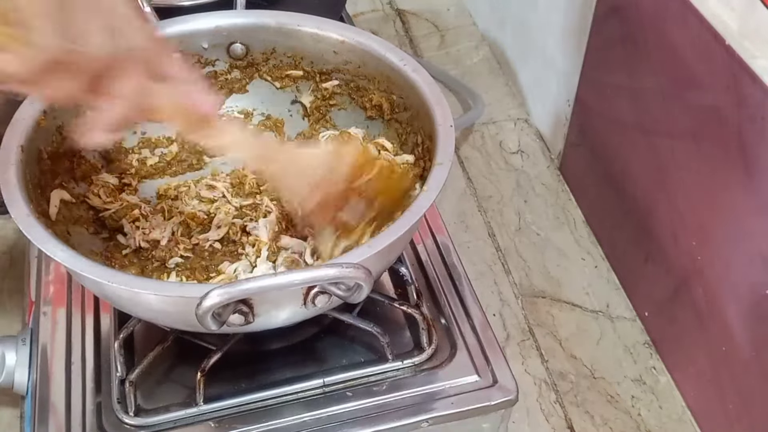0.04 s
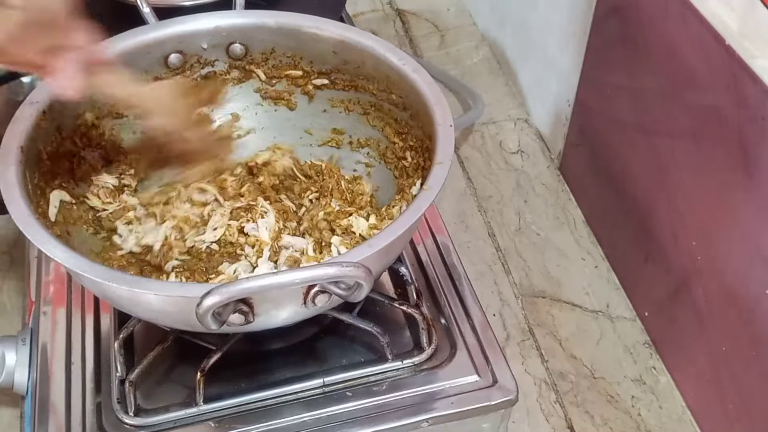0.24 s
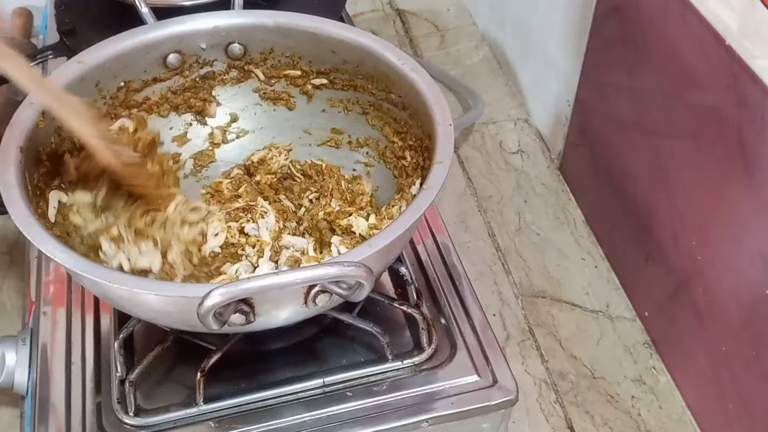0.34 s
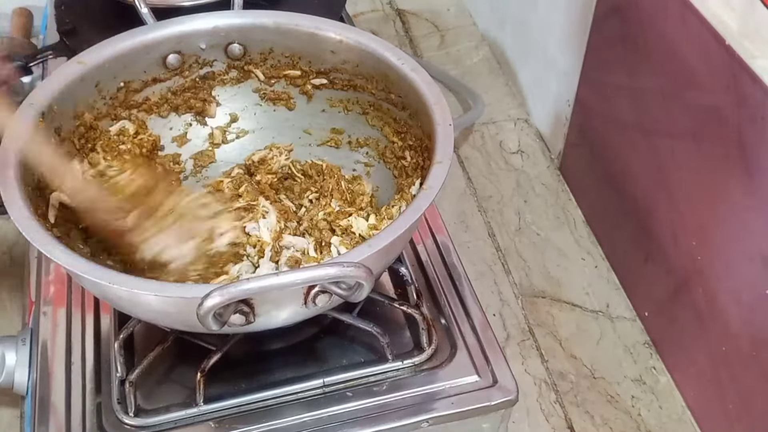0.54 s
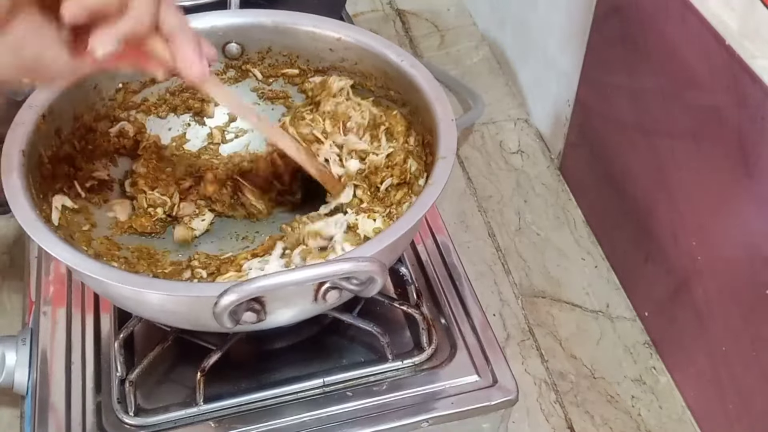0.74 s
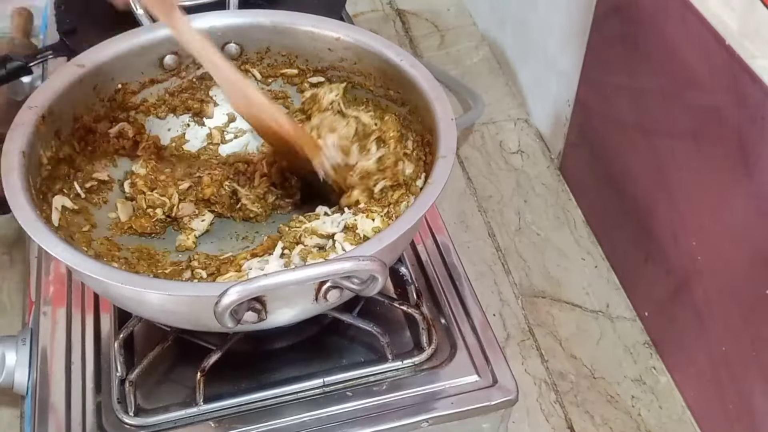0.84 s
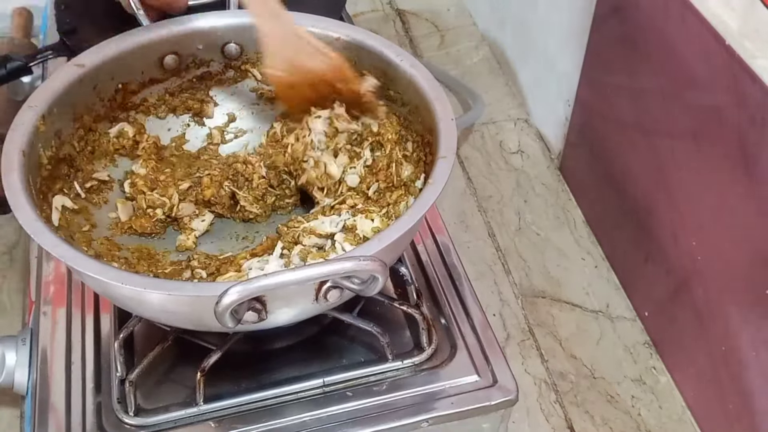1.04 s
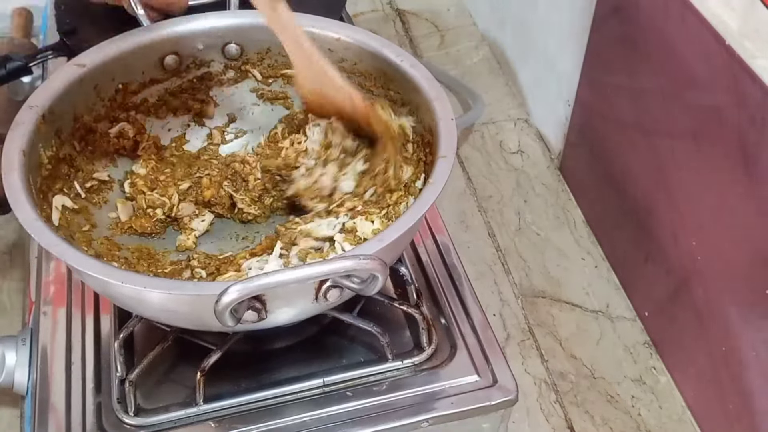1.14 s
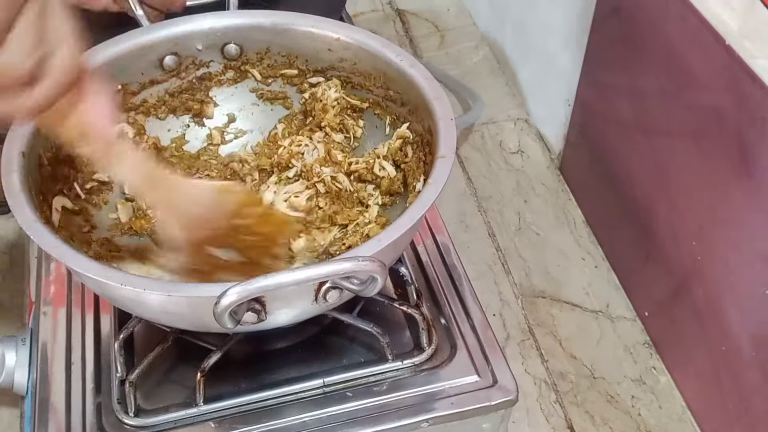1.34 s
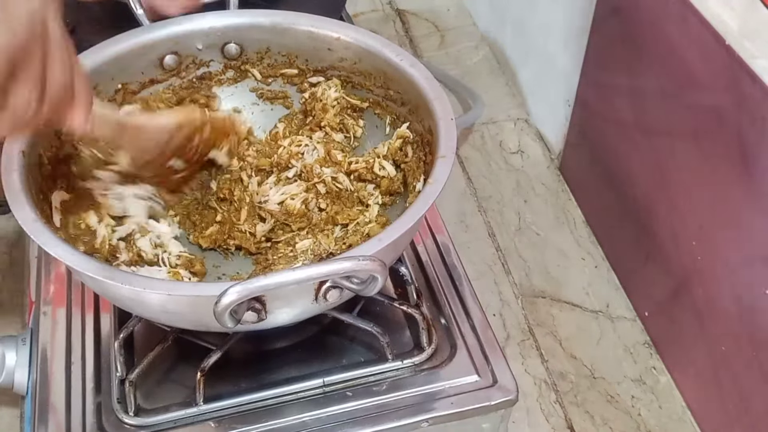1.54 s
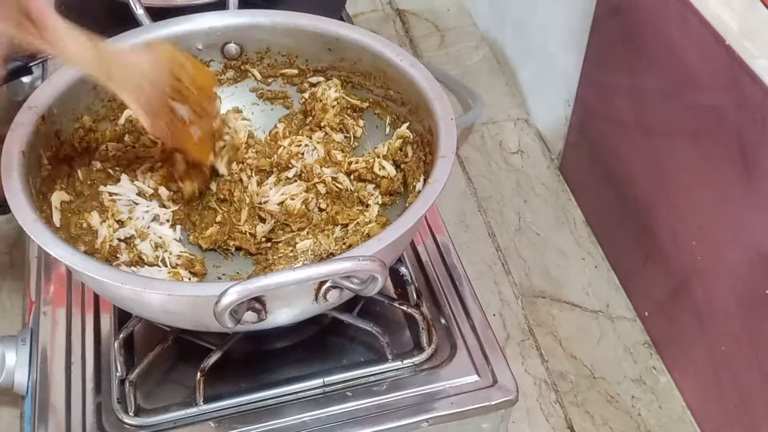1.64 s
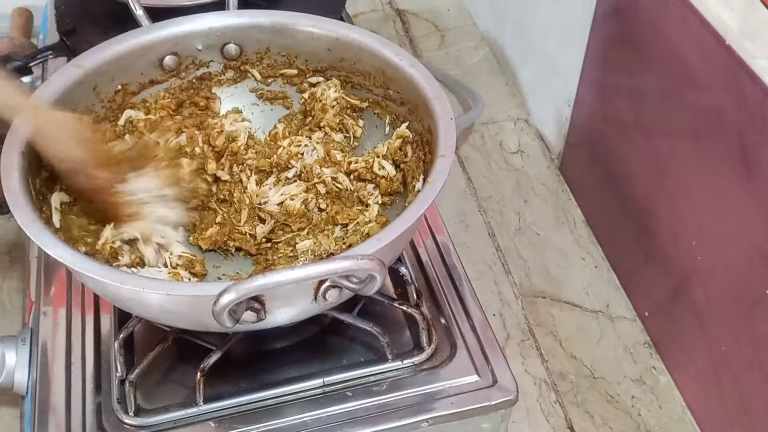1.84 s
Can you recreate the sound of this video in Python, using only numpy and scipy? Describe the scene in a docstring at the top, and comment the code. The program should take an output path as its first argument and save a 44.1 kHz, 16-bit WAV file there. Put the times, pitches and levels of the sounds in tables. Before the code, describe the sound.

A wooden spatula stirs moist filling in a metal pan, first juddering and clacking against the wall, then pushing through more softly. The food squelches and sizzles over a faint gas hiss, heard close up in a small kitchen.

```python
"""In a small kitchen, a wooden spatula stirs a moist chicken filling in a metal pan on a gas ring.
In the first stroke the blade judders over the pan and clacks against its wall, making metal and wood
ring; the second is a softer push through the food. The filling squelches and sizzles as it is turned,
a crowd of tiny clicks, and the burner hisses faintly throughout."""
import sys
import numpy as np
from scipy import signal
from scipy.fft import rfft, irfft
from scipy.io import wavfile
from scipy.ndimage import map_coordinates

SR = 44100
rng = np.random.default_rng(int(sys.argv[2]) if len(sys.argv) > 2 else 0)


def inscribe(sig):
    """Save sig as 16-bit PCM at rate SR to the path in sys.argv[1].

    A 1-D sig is mono; a 2-D sig holds one channel per row.
    Samples are clipped to [-1, 1] before scaling.
    """
    pcm = np.round(np.clip(np.atleast_2d(sig).T, -1, 1) * 32767)
    wavfile.write(sys.argv[1], SR, pcm.astype(np.int16))


N = 83790
TIME = np.arange(N) / SR
CLACK_ROOM_DB, KNOCK_ROOM_DB, BOOM_ROOM_DB, SQUELCH_ROOM_DB = -6, -1, -18.5, -14.5   # echo levels
GRAINS_PER_S, GRAIN_SPREAD_DB = 14000, 3   # the tiny clicks of rubbing and squelching
BOOM_LAG_S = 0.00097   # the deep sound starts just after the hit

# bright ringing tones of the pan wall and blade: (pitch [Hz], width [Hz], level [dB])
PAN_HIGH_TONES = [(1126, 31, -1), (1426, 29, 0.5), (1817, 116, -0.5), (2043, 99, 5), (2562, 76, 4.5),
                  (2847, 150, 3), (3587, 160, 0), (3963, 230, -1.5), (4270, 225, 5), (4686, 180, -1.5),
                  (4954, 110, 2.5), (5180, 56, -1), (5325, 150, 2.5), (5786, 204, 2), (6330, 227, 2.5),
                  (7160, 630, -5), (9260, 960, -15)]
# deep tones of the full pan on its stand: (pitch [Hz], width [Hz], level [dB])
PAN_LOW_TONES = [(50.5, 25, -37), (100.2, 16.4, -13.5), (175.3, 35.4, -11.5), (195, 11.7, -11.5),
                 (244.9, 22.4, -1), (269.9, 14, -1), (324.4, 18.2, 3.5), (366.3, 21, 1.5),
                 (405.4, 25.4, -4.5), (459, 41, -14), (558.5, 62, -10), (641, 91, -15.5),
                 (770.6, 31.3, -6.5), (774, 76, -11), (1001, 44, -21.5)]
# short-lived tones of the wooden spatula: (pitch [Hz], width [Hz], level [dB])
WOOD_TONES = [(433.8, 25, 11.5), (687, 149, 1.5), (789, 76, 4.5), (1000, 138, 3), (1174, 101, -4.5),
              (1427, 244, -4), (2175, 670, -6), (3300, 136, -3.5), (3760, 320, -9)]
# the spatula hits the pan:
# (time [s], bright clack [dB], wooden knock [dB], pan boom [dB], contact length [s], treble limit [Hz])
HITS = [(.197, -49, -60, -41.5, 0.0055, 3000), (.204, -47, -49, -40, 0.0087, 10000),
        (0.3286, -39, -46.5, -43, 0.0092, 6900), (0.3433, -42.5, -41, -33, 0.0087, 6050),
        (0.3959, -31, -41.5, -30.5, .007, 11800), (.437, -54, -55, -36.5, 0.013, 4000),
        (0.5106, -37, -46.5, -33, 0.0059, 6540), (0.5947, -41.5, -31, -33, 0.0038, 6060),
        (0.7539, -31.5, -37.5, -31, 0.0075, 11800), (0.808, -51, -56, -48, .008, 4500),
        (0.8538, -35.5, -43.5, -36, 0.0084, 8000), (0.8822, -39.5, -42.5, -37.5, 0.01, 5470),
        (0.904, -50, -55, -45, .0038, 3500), (.994, -49, -54.5, -37.5, 0.0128, 3940)]


def spatula_hits():
    """Each hit rings the pan wall, the wood and the whole pan; food under the blade dulls the clack."""
    force = 0
    for time, db, _, _, length_s, top_hz in HITS:
        push = contacts([time], [db], chatter=2.9, chatter_s=length_s)
        force = force + soften(push + 1e-18, top_hz)
    times, _, knock_db, boom_db, _, _ = np.transpose(HITS)
    clack = ring(force, PAN_HIGH_TONES)
    knock = ring(contacts(times, knock_db), WOOD_TONES)
    boom = ring(contacts(times + BOOM_LAG_S, boom_db), PAN_LOW_TONES)
    return (kitchen(clack, CLACK_ROOM_DB) + kitchen(knock, KNOCK_ROOM_DB, top_hz=2420)
            + kitchen(boom, BOOM_ROOM_DB))


# how hard the blade drags on the pan: (time [s], level [dB])
DRAG_LEVELS = [(0, -65.5), (.14, -110), (.165, -56), (.26, -38), (.31, -49.5), (.44, -44.5), (.58, -44.5),
               (.64, -38), (.715, -51.5), (.79, -45), (.84, -42.5), (1.04, -49.5), (1.11, -77),
               (1.205, -78), (1.23, -45), (1.4, -50), (1.525, -44.5), (1.595, -51.5), (1.645, -49.5),
               (1.69, -62.5), (1.9, -88)]
# the blade rubs through the food along the pan wall: (time [s], level [dB])
RUB_LEVELS = [(.18, -83), (.23, -54.5), (.32, -57), (.36, -58), (.44, -50), (.58, -61.5), (.68, -54.5),
              (.745, -46.5), (.83, -54), (.91, -53), (1, -78), (1.22, -90), (1.35, -64), (1.43, -56),
              (1.54, -51.5), (1.65, -69.5), (1.75, -90)]


def scraping():
    """The blade sticks and slips, shaking the whole pan; finer rubbing rings its wall and the wood."""
    slips = grains(per_s=890, spread_db=-1) * level(DRAG_LEVELS)
    friction = grains(GRAINS_PER_S, GRAIN_SPREAD_DB) * level(RUB_LEVELS) * from_db(drift(rate_hz=59))
    judder = ring(slips, PAN_LOW_TONES)
    rub = ring(friction, PAN_HIGH_TONES) + ring(friction, WOOD_TONES)
    return kitchen(judder, BOOM_ROOM_DB) + kitchen(moving_echoes(rub), SQUELCH_ROOM_DB)


# the filling squelches as it is pushed about: (time [s], level [dB])
SQUELCH_LEVELS = [(0, -62), (.165, -63.5), (.21, -46.5), (.3, -52.5), (.37, -52.5), (.41, -50), (.49, -59),
                  (.58, -60.5), (.66, -56.5), (.755, -45), (.82, -48.5), (.93, -62), (1.08, -61.5),
                  (1.2, -58.5), (1.24, -51.5), (1.35, -49), (1.44, -44.5), (1.525, -44.5), (1.605, -48),
                  (1.655, -58.5), (1.9, -65)]
# how strong the squelch is from low to high: (pitch [Hz], level [dB])
SQUELCH_COLOUR = [(200, 0), (900, -9), (1600, -4.5), (3000, -2.5), (4500, -1.5), (5700, 7.5), (6450, 12),
                  (7200, 3), (8300, 4), (11000, 0.5), (12700, -14), (13800, 0), (15000, 3.5)]
# moist bits of filling pop: (time [s], level [dB])
POPS = [(1.123, -52), (1.141, -54.5), (1.157, -61)]


def filling():
    """Wet crackle follows the stirring; between strokes come a few pops, each lower than the last."""
    stir = level(SQUELCH_LEVELS) * from_db(0.8 * drift(rate_hz=44))
    clicks = moving_echoes(grains(GRAINS_PER_S, GRAIN_SPREAD_DB))
    crackle = stir * coloured(clicks, SQUELCH_COLOUR)
    first_hz, width_hz, fall_octaves_per_s = 5970, 830, 9.1
    for time, db in POPS:
        hz = first_hz * 2 ** (-fall_octaves_per_s * (time - POPS[0][0]))
        pop = contacts([time], [db], chatter=7.1, chatter_s=0.0094)
        crackle = crackle + ring(pop, [(hz, width_hz, 0)])
    return kitchen(crackle, SQUELCH_ROOM_DB)


# the blade shoves a heap of filling: (time [s], wooden thud [dB], stove thump [dB])
SHOVES = [(.237, -38, -49), (0.339, -64, -42), (.46, -62, -49.5), (0.761, -63, -54.5), (1.234, -49.5, -53),
          (1.296, -43.5, -47.5)]
# deep tones of the stove frame: (pitch [Hz], width [Hz], level [dB])
STOVE_TONES = [(95, 30, -3.5), (122.3, 9.7, 4.5)]


def shoves():
    """Pushes cushioned by food: the wood thuds and the stove frame thumps, both muffled."""
    times, thud_db, thump_db = np.transpose(SHOVES)
    thud = ring(contacts(times, thud_db, chatter=1.5, chatter_s=0.0218), WOOD_TONES)
    thump = ring(contacts(times + BOOM_LAG_S, thump_db), STOVE_TONES)
    return soften(kitchen(thud, KNOCK_ROOM_DB) + thump, top_hz=730)


# the blade brushes the metal: (time of peak [s], fade time [s], pitch [Hz], level [dB])
GRAZES = [(.01, 0.032, 1550, -59), (1.095, 0.076, 4980, -66)]


def grazes(width_hz=310):
    """A light rub swells and fades, making one tone of the metal sing faintly."""
    out = 0
    for time, fade_s, hz, db in GRAZES:
        rub = rng.standard_normal(N) * np.exp(-((TIME - time) / fade_s) ** 2)
        out = out + from_db(db) * ring(rub, [(hz, width_hz, 0)])
    return out


# how strong the flame's hiss is from low to high: (pitch [Hz], level [dB])
FLAME_COLOUR = [(25, 2), (60, 11.5), (150, 11), (400, 2.5), (950, -8), (1300, -4.5), (1520, 17),
                (1900, -13), (2300, 15), (2950, -6), (3400, 11), (4200, -14), (6400, -3), (7600, -13),
                (10000, -7), (12300, 16.5), (13800, -6), (15100, 7.5)]
# thin whistles of the gas jet: (pitch [Hz], width [Hz], level [dB])
JET_TONES = [(6490, 300, -3.5), (10550, 240, -9), (11050, 160, 3), (12480, 270, -1), (15400, 250, 0)]


def burner():
    """The flame hisses steadily and the gas jet adds thin whistles."""
    hiss = from_db(-61) * coloured(rng.standard_normal(N), FLAME_COLOUR)
    whistles = from_db(-61.5) * ring(rng.standard_normal(N), JET_TONES)
    return hiss + whistles


def moving_echoes(x, delays_s=(.0013, .0023), swing=0.072, gain=.8):
    """Echoes off the pan wall and stove top shift as the blade moves, so the tone colour glides."""
    out = x
    for delay_s in delays_s:
        lag = delay_s * SR * (1 + swing * drift(rate_hz=2.5))
        out = out + gain * map_coordinates(x, [np.arange(N) - lag], order=3)
    return out / np.sqrt(1 + len(delays_s) * gain ** 2)


def kitchen(x, echo_db, top_hz=None):
    """Add the room's short wash of echoes, whose treble dies first."""
    low_fade_s, high_fade_s = 0.26, 0.16   # time to fall by 60 dB
    split_hz, delay_s = 2150, 0.0051
    t = TIME[:N // 4]
    noise = rng.standard_normal(len(t)) * (t > delay_s)
    low = signal.sosfilt(signal.butter(2, split_hz, fs=SR, output="sos"), noise)
    high = signal.sosfilt(signal.butter(2, split_hz, "high", fs=SR, output="sos"), noise)
    tail = low * from_db(-60 * t / low_fade_s) - high * from_db(-60 * t / high_fade_s)
    echo = from_db(echo_db) * signal.fftconvolve(x, tail / np.linalg.norm(tail))[:N]
    return x + (soften(echo, top_hz) if top_hz else echo)


def ring(x, tones):
    """A push makes an object ring: each tone swells and dies, and wider tones die sooner."""
    t, response = TIME[:N // 2], 0
    for k, (hz, width, db) in enumerate(tones):
        rate = np.pi * width / np.sqrt(np.sqrt(2) - 1)
        envelope = rate ** 2 * t * np.exp(-rate * t)
        response = response + (-1) ** k * from_db(db) * envelope * np.sin(2 * np.pi * hz * t)
    return signal.fftconvolve(x, response / np.linalg.norm(response))[:N]


def contacts(times, levels_db, chatter=0, chatter_s=.001):
    """One sharp push per touch, plus a short buzz that is `chatter` times as strong."""
    force, t = np.zeros(2 * N), TIME[:N // 20]
    level_span_s = 0.0097   # a touch has the energy of its level held this long
    for time, db in zip(times, levels_db):
        touch = chatter * burst(np.exp(-(t / chatter_s) ** 2))
        touch[0] += 1
        start = int(time * SR)
        force[start:start + len(t)] += from_db(db) * np.sqrt(level_span_s * SR) * touch / np.linalg.norm(touch)
    return force[:N]


def burst(envelope):
    """A short puff of noise, evened out so that it shakes all pitches alike."""
    x = rng.standard_normal(len(envelope)) * envelope
    for _ in range(4):
        even = irfft(np.exp(1j * np.angle(rfft(x))), len(x))
        x = even * envelope ** 0.25
    return x / np.linalg.norm(x)


def grains(per_s, spread_db):
    """Random clicks of uneven size."""
    sizes = from_db(spread_db * np.minimum(rng.exponential(1, N), 4)) * rng.choice([-1, 1], N)
    return unit_strength(sizes * (rng.random(N) < per_s / SR))


def soften(x, top_hz):
    """Take away the treble, as a soft contact does."""
    return signal.sosfilt(signal.butter(4, min(top_hz, SR / 3), fs=SR, output="sos"), x)


def coloured(x, colour):
    """Make some pitches of a sound stronger and others weaker."""
    hz, db = np.transpose(colour)
    pitches = np.fft.rfftfreq(N, 1 / SR) + 1
    gains = from_db(np.interp(np.log(pitches), np.log(hz), db))
    return unit_strength(irfft(rfft(x) * gains, N))


def drift(rate_hz):
    """A smooth random wobble, about 1 in size."""
    return coloured(rng.standard_normal(N), [(rate_hz, 0), (rate_hz * 10, -60)])


def level(rows):
    """Join (time [s], level [dB]) points into a volume curve."""
    return from_db(np.interp(TIME, *np.transpose(rows)))


def unit_strength(x):
    """Scale to an average strength (rms) of 1."""
    return x / np.sqrt(np.mean(x ** 2) + 1e-20)


def from_db(db):
    """Turn decibels into a multiplier."""
    return 10 ** (np.asarray(db) / 20)


def scene():
    """Spatula, filling and burner, heard from just above the stove."""
    return (spatula_hits() + shoves() + grazes() + scraping() + filling() + burner())[None]


def record(dry, bass_hz=45, top_hz=15550):
    """The microphone loses the deepest bass; the highest treble is cut steeply."""
    thin = signal.sosfilt(signal.butter(2, bass_hz, "high", fs=SR, output="sos"), dry)
    return signal.sosfilt(signal.ellip(12, .2, 70, top_hz, fs=SR, output="sos"), thin)


dry = scene()
out = record(dry)
inscribe(out)
```